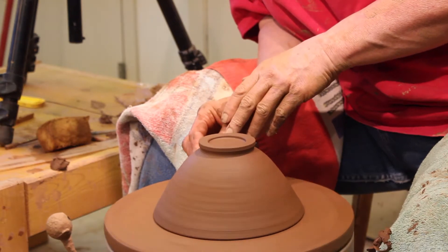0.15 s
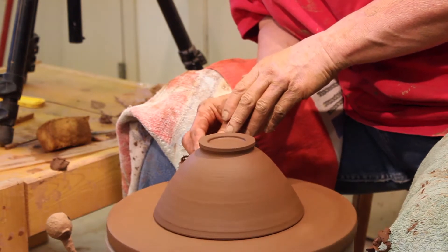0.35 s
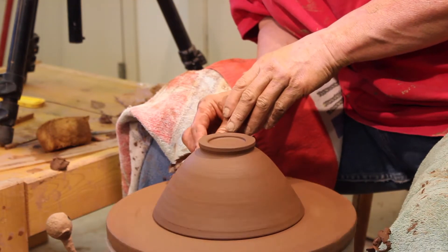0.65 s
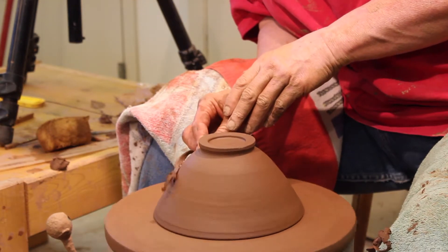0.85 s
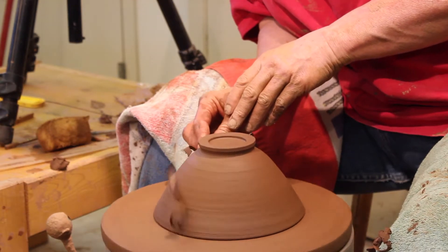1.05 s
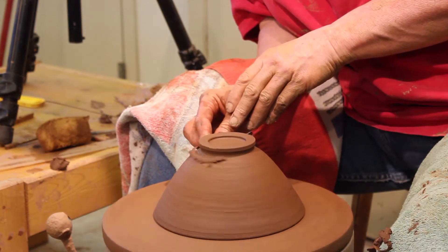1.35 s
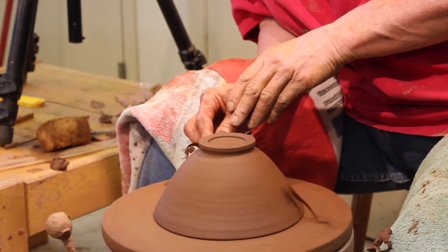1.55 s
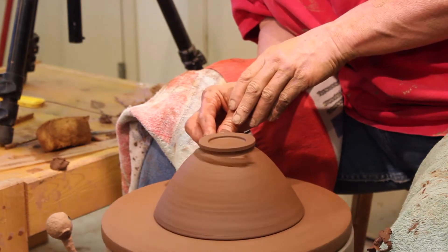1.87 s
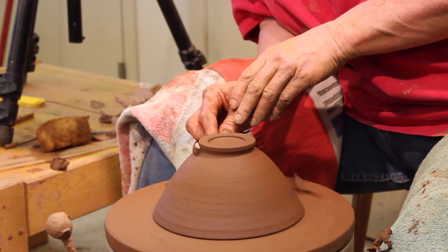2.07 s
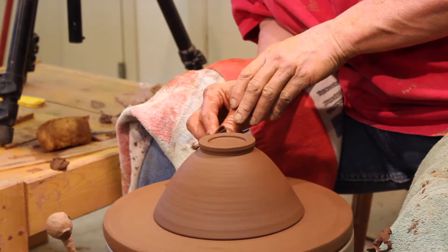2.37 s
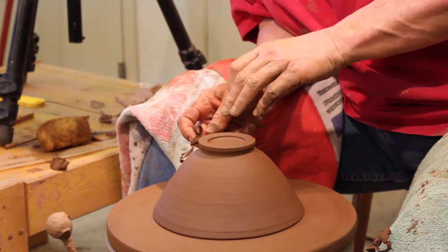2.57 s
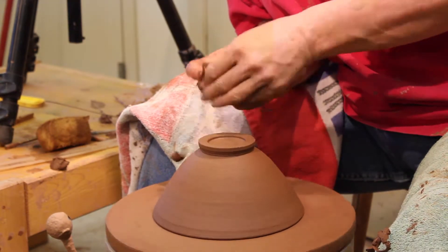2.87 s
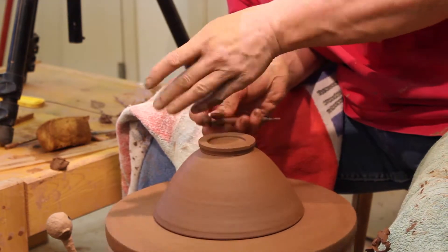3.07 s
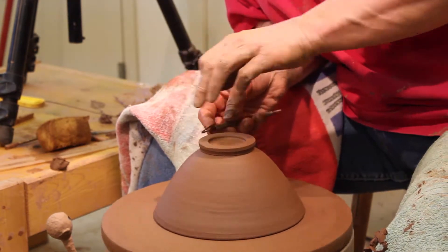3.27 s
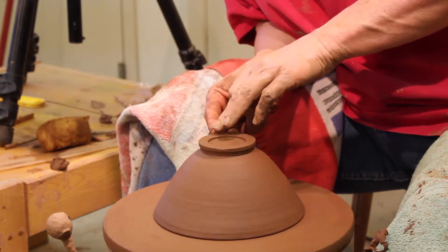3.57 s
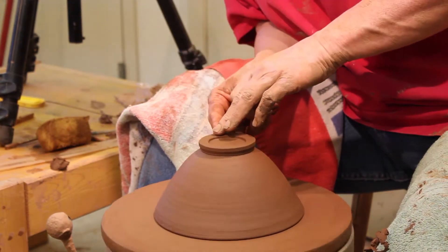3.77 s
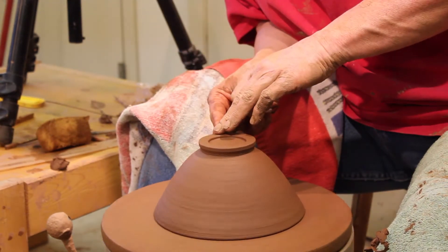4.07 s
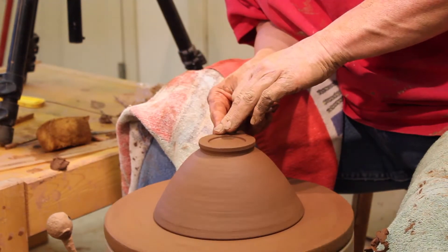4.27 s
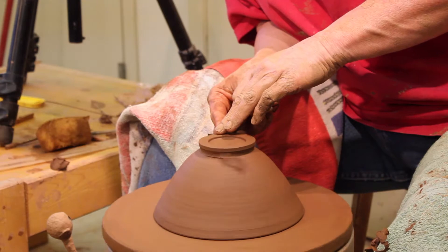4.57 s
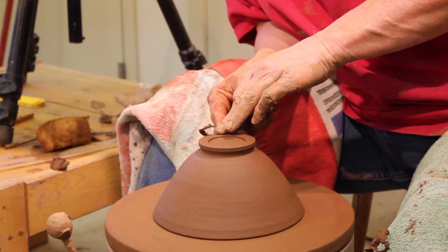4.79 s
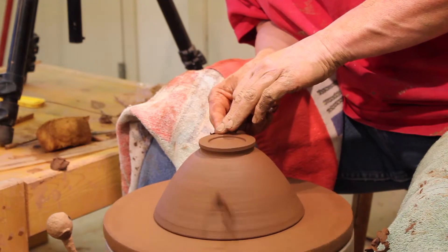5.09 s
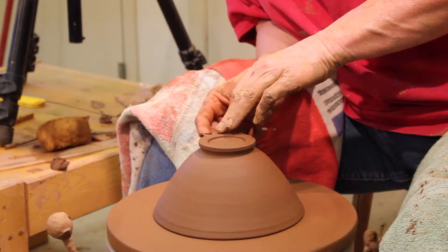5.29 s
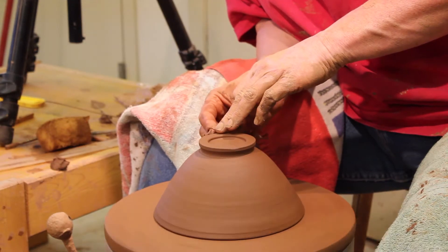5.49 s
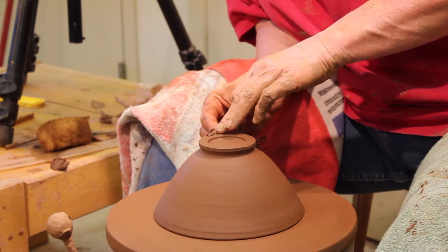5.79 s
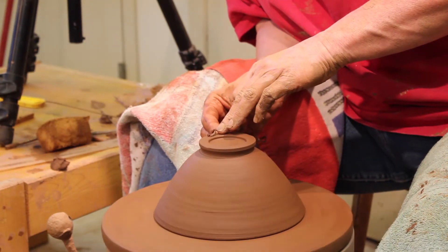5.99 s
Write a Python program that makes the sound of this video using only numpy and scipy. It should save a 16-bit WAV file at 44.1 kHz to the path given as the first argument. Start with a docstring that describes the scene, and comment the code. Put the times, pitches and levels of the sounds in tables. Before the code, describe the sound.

Low, pulsing motor drone and fluttering belt rumble in a quiet studio, with a thin hissy clay scrape dying away and two tiny ticks.

```python
"""An electric potter's wheel turns steadily in a quiet studio while a leather-hard bowl is trimmed. Throughout,
motor harmonics beat with a second rotating part, the belt rumbles in the housing as filtered noise and knocks
five times a loop, once loudly and four times softly, as struck resonances, and mains hum and microphone hiss
lie underneath. A cut already under way scrapes as resonated grains, ticking as it fades and again just after it
lifts; soon the whine changes colour, then a second, lighter cut begins and lasts to the end."""
import sys
import numpy as np
from scipy import signal
from scipy.fft import rfft, irfft
from scipy.io import wavfile

SR = 44100
rng = np.random.default_rng(int(sys.argv[2]) if len(sys.argv) > 2 else 0)


def unload_wav(signal):
    """Save mono or channel-first audio to the path in sys.argv[1] as 16-bit WAV at rate SR, clipped to [-1, 1]."""
    wavfile.write(
        sys.argv[1],
        SR,
        np.round(np.clip(np.atleast_2d(signal).T, -1, 1) * 32767).astype(np.int16),
    )


N = 270774

MOTOR_HZ = 15.403  # mean shaft turns per second
# Harmonics of the shaft. Columns: multiple of shaft speed, mean level/dB
MOTOR_HARMONICS = [(4, -71.5), (6, -74), (8, -61.5), (13, -69), (14, -65.5), (16, -63), (17, -64.5),
                   (18, -68), (19, -63.5), (20, -64.5), (21, -63), (22, -75.5), (23, -66), (24, -65.5),
                   (57, -62.5), (58, -62.5), (60, -67), (62, -79), (67, -77), (84, -72), (91, -79.5),
                   (107, -84), (109, -73.5), (128, -80.5), (169, -88)]
# Harmonic pairs of shaft and second part.
# Columns: multiple of shaft speed, shaft level at t = 0/dB, second part level at t = 0/dB, in step at t/s
BEATING_PAIRS = [(5, -66, -61.5, 2.84), (9, -46, -49.5, 2.756), (11, -59.5, -52.5, 3),
                 (12, -51, -55.5, 2.78)]
PARTNER_GAP_HZ = 0.0499  # extra turns per second of the second part
BEAT_SAG_DB_PER_S = 0.42

# Thin whistles in the motor whine. Columns: f/Hz, width/Hz, level before the change of colour is applied/dB
WHINE_WHISTLES = [(1186, 8, -74), (1616, 8, -77), (2486, 12, -82), (2516, 12, -83), (2633, 12, -85),
                  (2850, 12, -85), (3019, 12, -84), (3772, 12, -87), (3875, 12, -88), (3919, 12, -86),
                  (3979, 12, -84), (4113, 12, -88)]
WHISTLE_LIFT_DB = (-2, 1)  # before, after the change of colour
THIN_WHINE = (2590, 48, -74.5, -80)  # f/Hz, width/Hz, level before/dB, level after/dB
WHINE_SHIFT_S, WHINE_SHIFT_LENGTH_S = 3.03, 0.3
# Bands of the whine in the rumble. Columns: low f/Hz, high f/Hz, lift before/dB, lift after/dB
WHINE_COLOUR_BANDS = [(1430, 1730, -1, 2.5), (2450, 2720, 0.5, 0)]

BELT_LOOP_S = 0.6812  # one trip of the belt round the pulleys
# Spectrum of housing rumble, room noise and microphone hiss. Columns: f/Hz, relative spectral level/dB
RUMBLE_SPECTRUM = [(12, -58), (20, -5), (70, -18.5), (130, -9.5), (176, -8.5), (226, -17), (395, -16),
                   (552, 1), (887, -14), (992, -18.5), (1640, -26.5), (1880, -32.5), (2560, -33.5),
                   (3580, -36.5), (15700, -45)]
RUMBLE_DB = -42.5  # rms level ahead of the whine bands
# Narrow resonances and dips of the housing. Columns: f/Hz, width/Hz, lift/dB
HOUSING_MODES = [(100, 7.4, -5), (142.2, 10, 8), (158.4, 8, -13), (210, 10, 1.5), (229, 29, 7.5),
                 (430, 20, -2.5), (495, 35, 3), (748.5, 9.7, -4.5), (757, 54, 4), (1174, 83, 3.5),
                 (1365, 63, 4), (1610, 71, 4), (2400, 55, -2.5), (2600, 120, 3.5), (2810, 110, 2),
                 (3310, 180, 2.5), (3930, 50, 3)]
# Repeating share of the rumble power. Columns: f/Hz, share per belt loop (0-1), share per shaft turn (0-1)
REPEATING_SHARES = [(60, 0, 0.2), (190, 0.2, 0), (260, 0.2, 0.02), (446, 0.33, 0.04), (910, 0.36, 0.08),
                    (1280, 0.05, 0.24), (2530, 0.03, 0.02), (6000, 0, 0.07)]
# Strongest tones of the belt rumble. Columns: f/Hz, mean level/dB
BELT_PARTIALS = [(443.6, -61), (475.3, -62), (483.2, -61), (493.5, -62), (496.5, -60), (502.3, -61),
                 (508.2, -59), (518.6, -60), (536.1, -56), (546.4, -57), (553.3, -59), (562.6, -61),
                 (582.2, -59), (595.2, -61), (605.1, -59), (631.5, -62), (677.7, -61), (693.2, -65),
                 (728.6, -64), (750.5, -66)]
# Lumps on the belt striking the pulley. Columns: t into the loop/s, mean peak level/dB
BELT_LUMP_STRIKES = [(.027, -39), (.215, -40), (.291, -39), (.505, -41), (.594, -31.5)]
KNOCK_HZ, KNOCK_WIDTH_HZ = 551, 71

# Cuts of the trimming tool.
# Columns: touch t/s, deepest t/s, lift t/s, ring level at deepest/dB, scrape level at deepest/dB
TOOL_CUTS = [(-.5, .15, 2.55, -68.5, -65), (3.7, 5.0, 6.5, -91, -73)]
TRIM_RING_HZ, TRIM_RING_WIDTH_HZ = 5670, 1130
TRIM_HISS_HZ, TRIM_HISS_WIDTH_HZ, TRIM_HISS_DB = 7900, 2500, -8  # airy top, level relative to the ring
TRIM_SCRAPE_HZ, TRIM_SCRAPE_WIDTH_HZ = 2680, 1070
BITE_DB_PER_S = 4  # rise towards the deepest moment
RING_HOLD_S, RING_FADE_DB_PER_S, SCRAPE_FADE_DB_PER_S = 0.45, 9, 12.5
CONTACT_S = 0.15  # softness of touch and lift
UNEVEN_DB = 1.1  # rms wavering of the hand's pressure
# Wet ticks at the tool.
# Columns: t/s, initial level ahead of the onset ramp/dB, final f/Hz, t60/s, rise into the pitch (0-1)
TOOL_TICKS = [(2.1440, -49, 6000, .007, .25), (2.7536, -44.5, 3300, .016, .3)]

MAINS_HZ, MAINS_DB = 120.05, -50.5
WARBLE_HZ, WARBLE_DB, WARBLES_PER_S, WARBLE_DEPTH_RAD = 58.08, -59.5, 3.06, 1.1
CUTOFF_HZ = 15740


def from_db(db):
    """Level to gain: amplitude is ten to the power of level / 20."""
    return 10 ** (np.asarray(db) / 20)


def rms_one(x):
    """Normalisation to unit root-mean-square amplitude."""
    return x / np.sqrt(np.mean(x ** 2) + 1e-20)


def at_hz(points, hz, axis=1):
    """Interpolation of a spectrum column along logarithmic frequency."""
    points = np.array(points)
    return np.interp(np.log(hz), np.log(points[:, 0]), points[:, axis])


def drift(rate):
    """Random fluctuation of rms 1: white noise through a two-pole low-pass, computed every 40 samples."""
    r = np.exp(-80 * np.pi * rate / SR)
    noise = rng.standard_normal(N // 40 + 4002)
    slow = signal.lfilter([1], [1, -2 * r, r * r], noise)[4000:]  # drop the settling of the filter
    return np.interp(np.arange(N) / 40, np.arange(len(slow)), rms_one(slow))


def resonate(x, hz, width_hz):
    """Damped resonance: a pole pair whose radius sets the bandwidth, with about unit gain at its peak."""
    r = np.exp(-np.pi * width_hz / SR)
    zeros = np.array([1, 0, -1]) * (1 - r * r) / 2
    poles = [1, -2 * r * np.cos(2 * np.pi * hz / SR), r * r]
    return signal.lfilter(zeros, poles, x + 1e-18)


def resonate_twice(x, hz, width_hz):
    """Two equal resonances in series: steeper skirts about the same centre."""
    return resonate(resonate(x, hz, width_hz), hz, width_hz)


def tone(level_db, angle):
    """Simple harmonic motion of given rms level and random initial phase."""
    return from_db(level_db) * np.sqrt(2) * np.sin(angle + rng.uniform(0, 2 * np.pi))


def looped(turns, count):
    """Periodic excitation: the same rough surface passes again on every turn."""
    surface = rng.standard_normal(count)
    return surface[(turns % 1 * count).astype(int)]


def step(at_s, length_s):
    """Smooth transition from 0 to 1 along a hyperbolic tangent."""
    return 0.5 + 0.5 * np.tanh(2 * (np.arange(N) / SR - at_s) / length_s)


def motor_turns():
    """Rotation angle in turns: the integral of a slightly wavering shaft speed."""
    speed = MOTOR_HZ * (1 + 0.0003 * drift(0.5))
    return np.cumsum(speed) / SR


def motor_hum(turns):
    """Harmonic series of a rotating shaft: each partial follows the shaft angle and wavers in level."""
    angle = 2 * np.pi * turns
    waver = [drift(0.17) for _ in range(4)]
    steady = sum(tone(db + 2.0 * waver[k % 4], k * angle) for k, db in MOTOR_HARMONICS)
    return steady + beating(angle)


def beating(angle):
    """Beats by superposition: two close harmonics are loudest in step; the hum slowly grows quieter."""
    t, pairs = np.arange(N) / SR, 0
    for k, shaft_db, partner_db, in_step_s in BEATING_PAIRS:
        shaft_angle = k * angle + rng.uniform(0, 2 * np.pi)
        slip = 2 * np.pi * k * PARTNER_GAP_HZ * (t - in_step_s)
        shaft = from_db(shaft_db) * np.sin(shaft_angle)
        partner = from_db(partner_db) * np.sin(shaft_angle + slip)
        pairs = pairs + shaft + partner
    return np.sqrt(2) * pairs * from_db(-BEAT_SAG_DB_PER_S * t)


def whine_lift(before_db, after_db):
    """Change of timbre: the gain of one part of the whine passes smoothly between two levels."""
    change = step(WHINE_SHIFT_S, WHINE_SHIFT_LENGTH_S)
    return from_db(before_db + (after_db - before_db) * change)


def motor_whine():
    """Narrow-band noise: sharp resonances select thin whistles from one broadband noise."""
    air = rng.standard_normal(N)
    whistles = sum(from_db(db) * rms_one(resonate_twice(air, hz, width))
                   for hz, width, db in WHINE_WHISTLES)
    hz, width, before_db, after_db = THIN_WHINE
    thin = whine_lift(before_db, after_db) * rms_one(resonate_twice(air, hz, width))
    return thin + whine_lift(*WHISTLE_LIFT_DB) * whistles


def rumble(turns):
    """Source and filter: periodic belt and shaft roughness plus fresh noise, coloured by the housing."""
    hz = np.maximum(np.fft.rfftfreq(N, 1 / SR), 1)
    belt_share, shaft_share = (np.clip(at_hz(REPEATING_SHARES, hz, axis=k), 0, 0.45) for k in (1, 2))
    belt = looped(np.arange(N) / SR / BELT_LOOP_S, count=round(BELT_LOOP_S * SR))
    shaft = looped(turns, count=round(SR / MOTOR_HZ))
    # shares are powers, hence the square roots
    mix = np.sqrt(belt_share) * rfft(belt) + np.sqrt(shaft_share) * rfft(shaft)
    mix += np.sqrt(1 - belt_share - shaft_share) * rfft(rng.standard_normal(N))
    modes_db = sum(db / (1 + (2 * (hz - top) / width) ** 2) for top, width, db in HOUSING_MODES)
    colour_db = at_hz(RUMBLE_SPECTRUM, hz) + modes_db
    body = from_db(RUMBLE_DB) * rms_one(irfft(mix * from_db(colour_db), N))
    lifted = body
    for low_hz, high_hz, before_db, after_db in WHINE_COLOUR_BANDS:
        band_filter = signal.butter(2, [low_hz, high_hz], "band", fs=SR, output="sos")
        band = signal.sosfilt(band_filter, body)
        lifted = lifted + (whine_lift(before_db, after_db) - 1) * band
    return lifted


def belt_tones():
    """Interference of close partials of the belt loop: their beats give the rumble its flutter."""
    waver = [drift(0.94) for _ in range(5)]
    clock = 2 * np.pi * np.arange(N) / SR
    return sum(tone(db + 1.2 * waver[k % 5], hz * clock) for k, (hz, db) in enumerate(BELT_PARTIALS))


def belt_knocks():
    """Impulse response: soft lumps ring the housing briefly, a little differently on every loop."""
    clicks = np.zeros(N)
    for s, peak_db in BELT_LUMP_STRIKES:
        # strike 4 ms early, as the resonance takes time to build
        at = (np.arange(s - 0.004, N / SR, BELT_LOOP_S) * SR).astype(int)
        clicks[at] += from_db(peak_db + 1.5 * rng.standard_normal(10)[:len(at)])
    impulse = np.eye(1, 2000)[0]
    unit_peak = resonate_twice(impulse, KNOCK_HZ, KNOCK_WIDTH_HZ).max()
    return resonate_twice(clicks, KNOCK_HZ, KNOCK_WIDTH_HZ) / unit_peak


def trimming():
    """Friction excitation: grit under the blade scrapes clay and rings the tool, dying as the cut lightens."""
    sizes = from_db(2.3 * rng.exponential(1, N).clip(0, 4))
    grains = (rng.random(N) < 9000 / SR) * sizes  # about 9000 grains per second
    grit = grains * rng.standard_normal(N) * from_db(1.2 * drift(30))
    t, ring_gain, scrape_gain = np.arange(N) / SR, 0, 0
    for touch_s, deepest_s, lift_s, ring_db, scrape_db in TOOL_CUTS:
        contact = step(touch_s, CONTACT_S) * (1 - step(lift_s, CONTACT_S))
        bite_db = -BITE_DB_PER_S * np.maximum(deepest_s - t, 0)
        contact = contact * from_db(bite_db + UNEVEN_DB * drift(7.5))
        past = np.maximum(t - deepest_s, 0)
        ring_fade_db = RING_FADE_DB_PER_S * np.maximum(past - RING_HOLD_S, 0)
        ring_gain = ring_gain + contact * from_db(ring_db - ring_fade_db)
        scrape_gain = scrape_gain + contact * from_db(scrape_db - SCRAPE_FADE_DB_PER_S * past)
    ring = rms_one(resonate_twice(grit, TRIM_RING_HZ, TRIM_RING_WIDTH_HZ))
    hiss = rms_one(resonate_twice(grit, TRIM_HISS_HZ, TRIM_HISS_WIDTH_HZ))
    scrape = rms_one(resonate_twice(grit, TRIM_SCRAPE_HZ, TRIM_SCRAPE_WIDTH_HZ))
    return ring_gain * (ring + from_db(TRIM_HISS_DB) * hiss) + scrape_gain * scrape


def ticks():
    """Damped oscillation: short rings slide up into their pitch within a millisecond or two."""
    out, t = np.zeros(N), np.arange(int(0.05 * SR)) / SR
    for s, peak_db, hz, t60, rise in TOOL_TICKS:
        pitch = hz * (1 - rise * np.exp(-t / 0.0006))
        angle = 2 * np.pi * np.cumsum(pitch) / SR
        onset = 1 - np.exp(-t / 0.0003)
        out[int(s * SR):][:len(t)] += from_db(peak_db - 60 * t / t60) * np.sin(angle) * onset
    return out


def mains_hum():
    """Forced vibration at a fixed mains frequency, with a slowly fluctuating level."""
    clock = 2 * np.pi * np.arange(N) / SR
    return tone(MAINS_DB + 0.89 * drift(1.0), MAINS_HZ * clock)


def low_warble():
    """Phase modulation: a low tone warbles as its phase swings sinusoidally."""
    clock = 2 * np.pi * np.arange(N) / SR
    swing = WARBLE_DEPTH_RAD * np.sin(WARBLES_PER_S * clock)
    return tone(WARBLE_DB, WARBLE_HZ * clock + swing)


def scene():
    """Linear superposition of all sources at one microphone."""
    turns = motor_turns()
    wheel = motor_hum(turns) + motor_whine() + rumble(turns) + belt_tones() + belt_knocks()
    tool = trimming() + ticks()
    return (wheel + tool + mains_hum() + low_warble())[None]


def record(dry):
    """Band limitation: a steep elliptic low-pass removes the top of the spectrum."""
    low_pass = signal.ellip(16, 0.2, 70, CUTOFF_HZ, fs=SR, output="sos")
    return signal.sosfilt(low_pass, dry)


dry = scene()
out = record(dry)
unload_wav(out)
```